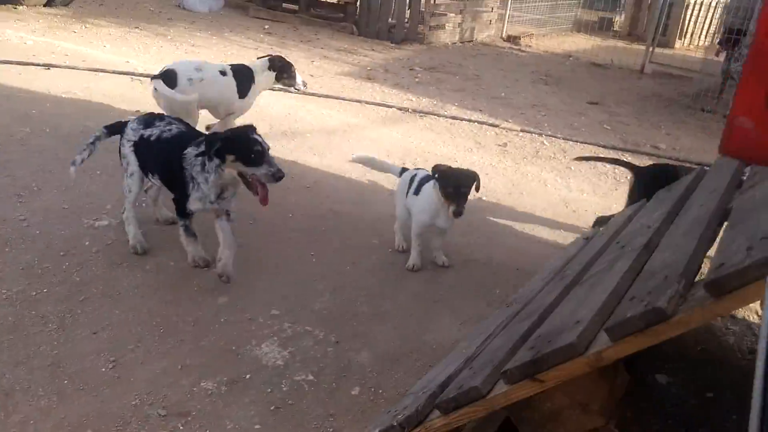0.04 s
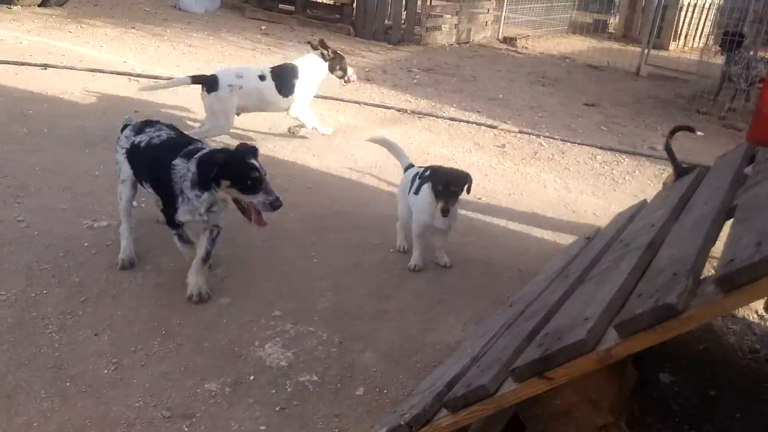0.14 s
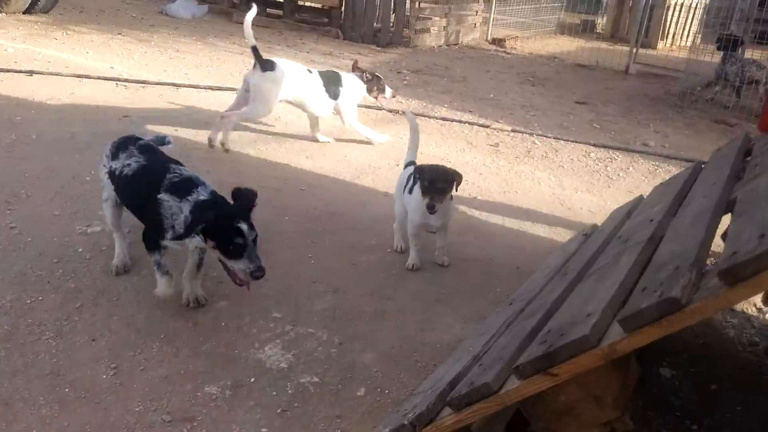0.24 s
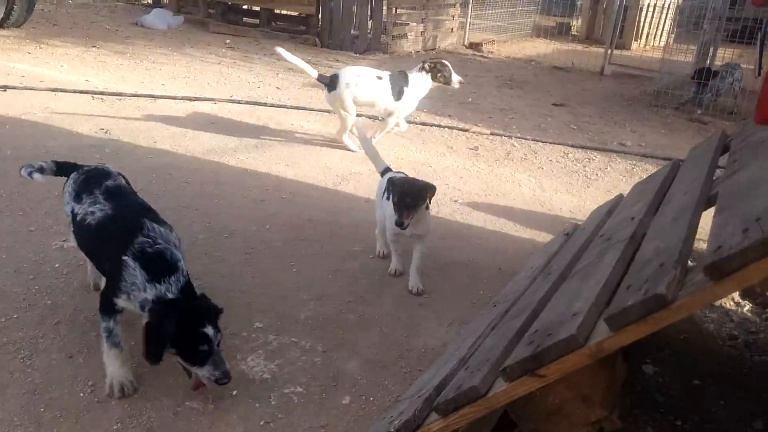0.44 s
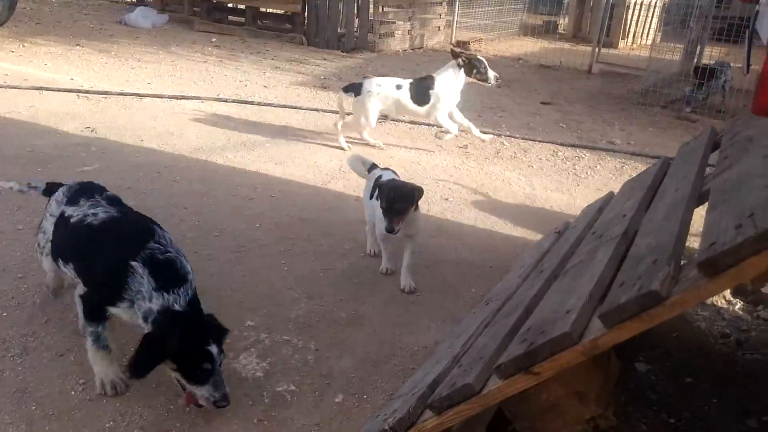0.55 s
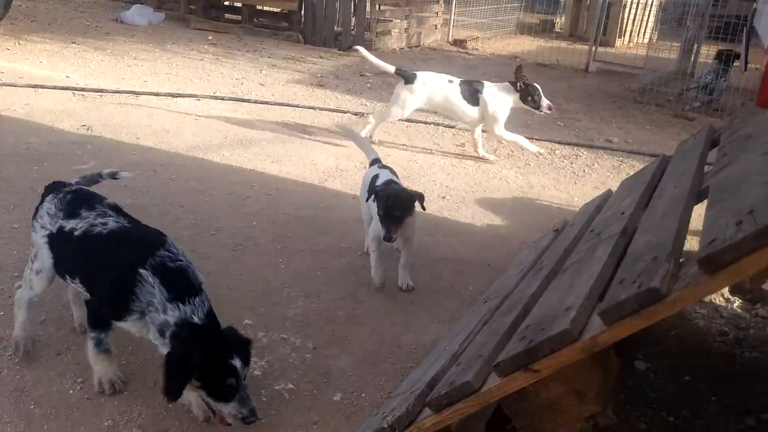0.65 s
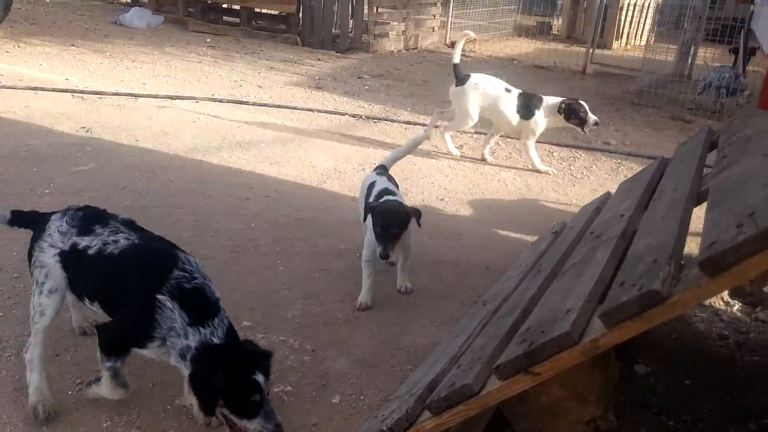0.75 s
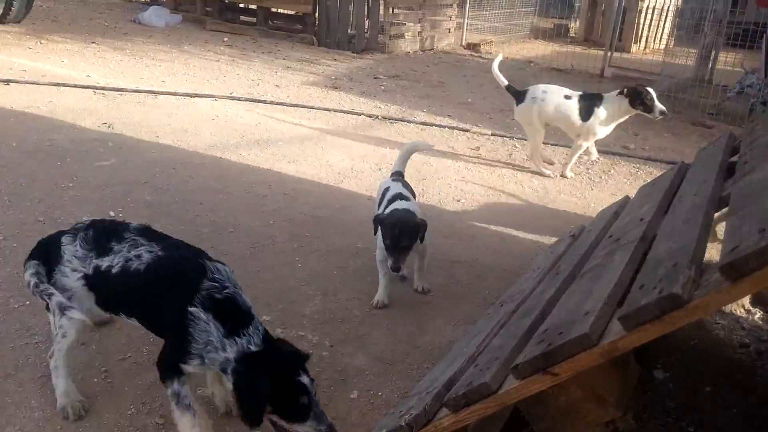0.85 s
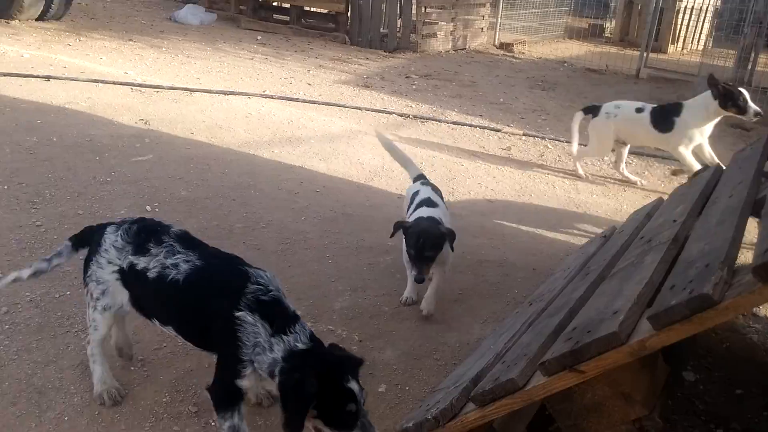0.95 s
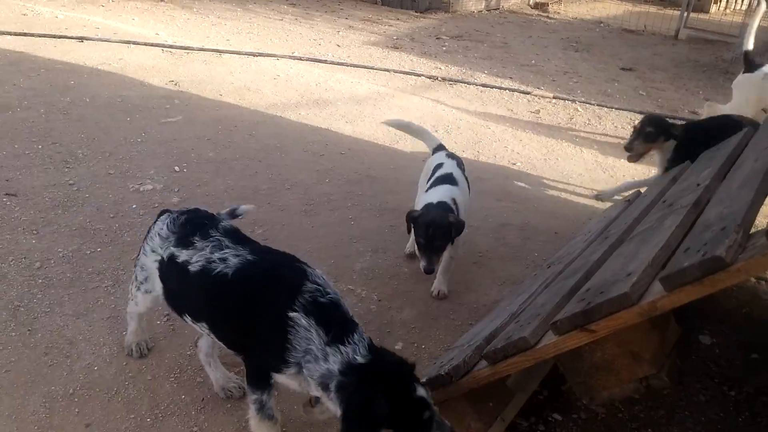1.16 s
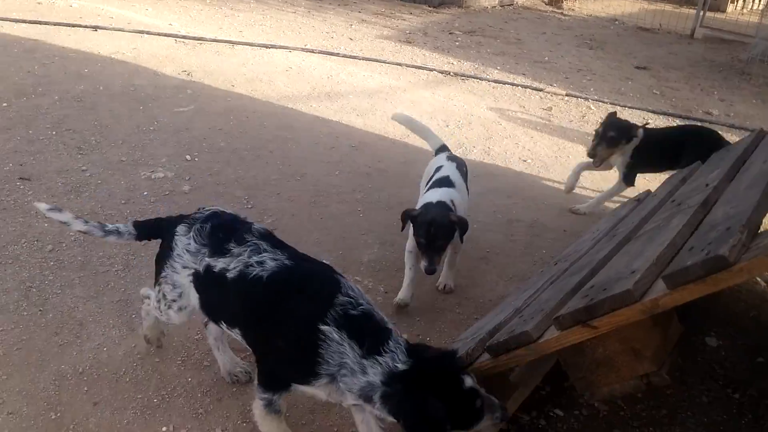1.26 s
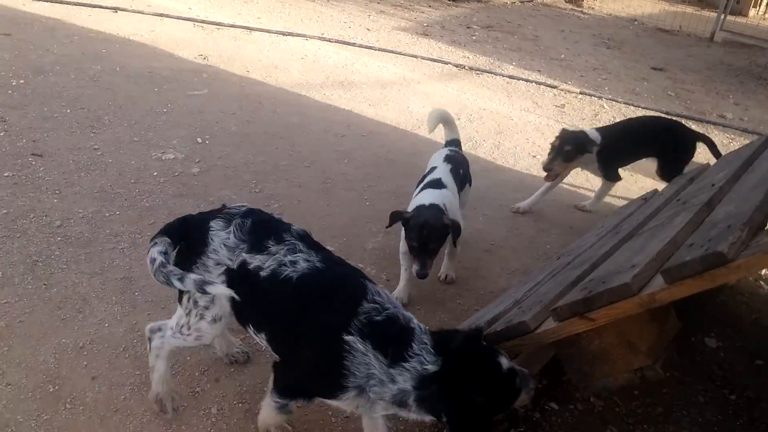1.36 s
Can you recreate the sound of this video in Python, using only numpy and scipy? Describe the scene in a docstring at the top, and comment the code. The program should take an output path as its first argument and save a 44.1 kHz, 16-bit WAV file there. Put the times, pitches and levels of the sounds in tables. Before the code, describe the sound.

A dog gives three short, hoarse barks in a yard, with faint whines between.

```python
"""An open yard with fences and sheds, a dog a little to the right of the microphone.
After the hissy tail of an earlier bark come three short, hoarse barks, each an arch of pitch from the
vocal folds with rasp on top; the first cracks into a yelp. Thin whines and two scuffs of paws on grit
fall in between. The fences and sheds throw everything back over quiet outdoor air."""
import sys
import numpy as np
from scipy import signal
from scipy.fft import rfft, irfft
from scipy.io import wavfile
from scipy.ndimage import uniform_filter1d

SR = 44100
rng = np.random.default_rng(int(sys.argv[2]) if len(sys.argv) > 2 else 0)


def master_out(mix):
    """Clip the mix to full scale and print it as 16-bit PCM to the path in sys.argv[1]."""
    frames = np.transpose(np.atleast_2d(mix))
    ceiling = np.clip(frames, -1, 1)
    pcm = np.round(ceiling * 32767).astype(np.int16)
    wavfile.write(sys.argv[1], SR, pcm)


N = 61739
BIN_HZ = np.arange(N // 2 + 1) * SR / N


def undb(db):
    """Decibels to gain."""
    return 10 ** (np.asarray(db) / 20)


def unit(x):
    """Scale to rms 1."""
    return x / np.sqrt(np.mean(x ** 2))


def gain_at(hz, points):
    """Read a table of f/Hz, level/dB as gains."""
    f, db = np.array(points, float).T
    return undb(np.interp(np.log(hz + 1), np.log(f), db))


def colour(x, points):
    """Filter by a table of f/Hz, level/dB, falling steeply beyond its ends; scale to rms 1."""
    f = BIN_HZ + 1
    edges = 1 / np.sqrt((1 + (.7 * points[0][0] / f) ** 8) * (1 + (.7 * f / points[-1][0]) ** 8))
    return unit(irfft(rfft(x) * gain_at(f, points) * edges, N))


def noise(points):
    """Coloured noise of rms 1."""
    return colour(rng.standard_normal(N), points)


def wobble(hz):
    """Smooth random motion of rms 1, mostly slower than hz."""
    return unit(signal.sosfilt(signal.butter(4, hz, fs=SR, output="sos"), rng.standard_normal(N)))


def swell(t, centre, width):
    """A bell curve of height 1."""
    return np.exp(-.5 * ((t - centre) / width) ** 2)


def partials(weights, phases):
    """A weighted sum of sines at rms 1."""
    return (weights * np.sin(phases)).sum(axis=0) / np.sqrt((weights ** 2).sum(axis=0) / 2)


def controls(t, rows):
    """A gate over the rows' span, then each column as a curve in time."""
    times, *columns = np.array(rows, float).T
    gate = uniform_filter1d(1. * ((t > times[0]) & (t < times[-1])), size=200)
    return [gate] + [np.interp(t, times, column) for column in columns]


def diffuse(low_hz=55, high_hz=780):
    """White noise from all around the microphone: left and right are alike between the two limits."""
    alike = BIN_HZ ** 2 / (BIN_HZ ** 2 + low_hz ** 2) / (1 + (BIN_HZ / high_hz) ** 4)
    mid, side = rfft(rng.standard_normal((2, N)))
    mid, side = mid * np.sqrt(1 + alike), side * np.sqrt(1 - alike)
    return irfft(np.array([mid + side, mid - side]), N) / np.sqrt(2)


# Spectrum of the air over the yard: f/Hz, level/dB
AIR_SPECTRUM = [(35, -24.5), (70, -0.5), (600, -0.5), (1000, -11), (2800, -9), (6500, -23), (15000, -42)]
def still_air():
    """Quiet, steady outdoor air on every side."""
    return undb(-52.5) * colour(diffuse(), AIR_SPECTRUM)


# Spectrum of an echo hanging in the yard: f/Hz, level/dB
ECHO_SPECTRUM = [(400, -22.5), (600, 2.5), (1000, -7), (1500, -15), (2100, -6), (3500, -33)]
def dying_echo(t, start_db=-31, fall_db_per_s=113):
    """A diffuse echo that dies away in the opening moments."""
    return colour(diffuse(), ECHO_SPECTRUM) * undb(start_db - fall_db_per_s * t)


# Colour of what fences and sheds throw back: f/Hz, level/dB
REFLECTION_COLOUR = [(500, -2.5), (590, 2.5), (720, -2.5), (3000, 2)]
def yard(t, source, left_lag_s=.0002, fence_s=.0395, scatter_t60_s=.22, low_t60_s=.83, high_t60_s=.95):
    """Direct sound from the right, an echo off the near fence, a quick scatter and a longer tail."""
    def arrival(x, delay_s):
        return np.array([np.interp(t - delay_s - lag_s, t, x, left=0) for lag_s in (left_lag_s, 0)])

    def fade(t60_s):  # reflections build up over 12 ms, then die away
        return np.clip(t / .012, 0, 1) ** 2 * np.exp(-np.log(1000) * t / t60_s)

    thrown = irfft(rfft(source) * gain_at(BIN_HZ, REFLECTION_COLOUR), N)
    far = diffuse()
    low = signal.sosfiltfilt(signal.butter(2, 1100, fs=SR, output="sos"), far)
    tail = (low * fade(low_t60_s) + (far - low) * fade(high_t60_s)) / np.linalg.norm(fade(low_t60_s))
    scatter = diffuse() * fade(scatter_t60_s) / np.linalg.norm(fade(scatter_t60_s))
    response = undb(-12) * tail + undb(-6.5) * scatter
    reverb = signal.fftconvolve(thrown[None], response, axes=1)[:, :N]
    return arrival(source, 0) + undb(-14) * arrival(thrown, fence_s) + reverb


# Balance at the microphone, left minus right: f/Hz, level/dB
BALANCE = [(500, -1.5), (2400, -6), (4400, -15.5), (8000, -16.5), (14000, 8.5)]
def shade_left(stereo):
    """The microphone's left side is shaded, and quieter in all but the highest treble."""
    shade = np.sqrt(gain_at(BIN_HZ, BALANCE))
    return irfft(rfft(stereo) * np.array([shade, 1 / shade]), N)


# Hissy tail of an earlier bark, then two paw scuffs: centre t/s, level/dB, half length/s
HISSY_BURSTS = [(0.017, -52.5, 0.017), (0.644, -49.5, 0.0088), (0.911, -45, 0.025)]
# Spectrum of these bursts: f/Hz, level/dB
BURST_SPECTRUM = [(800, -12.5), (1600, 19.5), (3900, 1), (6200, 1.5), (12500, -44.5)]
# Dull bumps: onset t/s, level/dB
DULL_BUMPS = [(0.937, -31.5), (1.332, -28)]
# Spectrum of a bump: f/Hz, level/dB
BUMP_SPECTRUM = [(230, -13.5), (620, -5), (1100, -18), (3500, -22), (4500, -44)]
def bark_tail_and_paws(t, rise_s=.007, decay_s=.0088):
    """An earlier bark fades in a brief hiss at the start; later, paws scuff on grit and bump dully."""
    bursts = sum(undb(db) * swell(t, at, width) for at, db, width in HISSY_BURSTS)
    rough_hiss = unit(noise(BURST_SPECTRUM) * undb(2.4 * wobble(280)))
    bumps = np.zeros(N)
    for at, db in DULL_BUMPS:
        rise = np.clip((t - at) / rise_s, 0, 1) ** 2
        bumps += undb(db) * rise * np.exp(-np.abs(t - at - rise_s) / decay_s)
    return bursts * rough_hiss + bumps * noise(BUMP_SPECTRUM)


# Whines to the right of the microphone, one table each: t/s, f/Hz, level/dB
WHINE_PATHS = [
    [(.123, 4635, -53.5), (.18, 4363, -60), (.24, 4314, -52)],
    [(.77, 5490, -75), (.85, 5350, -69)],
    [(.84, 1538, -51), (.93, 1530, -46)],
    [(.878, 2823, -45.5), (.897, 2558, -44.5), (.913, 2511, -31), (.945, 2550, -59)],
    [(.928, 2120, -35), (.939, 1860, -27.5)],
    [(1.264, 2850, -47), (1.282, 2614, -36), (1.296, 2381, -41), (1.35, 2351, -41)],
]
def whine(t, rows, jitter_hz=32, shimmer=.35):
    """A thin whistle with a weak octave; the low ones quaver, the high ones are nearly pure."""
    gate, hz, db = controls(t, rows)
    quaver = np.interp(hz, [2600, 4300], [1, .15])
    phase = 2 * np.pi * np.cumsum(hz + quaver * jitter_hz * wobble(400)) / SR
    octave = undb(-23.5) * gain_at(2 * hz, [(5050, -1), (5300, -14)])
    tone = np.sqrt(2) * (np.sin(phase) + octave * np.sin(2 * phase))
    return gate * undb(db) * tone * (1 + quaver * shimmer * wobble(90))


# Mouth resonances in the second and third barks: centre t/s, half length/s, f/Hz, level/dB
MOUTH_RINGS = [(.512, .02, 835, -28.5), (.548, 0.0086, 1520, -27), (1.085, 0.011, 1900, -28),
               (1.07, 0.024, 4430, -53), (1.085, 0.0094, 5830, -50)]
def mouth_ring(t, at, width, hz, db, half_band_hz=40, rise_per_s=.25):
    """A narrow resonance of the mouth swells and fades, rising as the jaw opens."""
    phase = 2 * np.pi * np.cumsum(hz * (1 + rise_per_s * (t - at))) / SR
    band = wobble(half_band_hz) * np.cos(phase) + wobble(half_band_hz) * np.sin(phase)
    return undb(db) * swell(t, at, width) * band


# Weight that throat and mouth give to the harmonics: f/Hz, level/dB
THROAT_COLOUR = [(250, 4), (600, 13), (900, 0.5), (1600, -18.5), (2450, -16.5), (3000, -11.5),
                 (4000, -49.5), (6100, -48.5), (11000, -77)]
def vocal_folds(hz, jitter, shimmer, overtone_db, flutter_hz=178.5):
    """Unsteady folds heard through the throat; returns the tone, its phase and the pulsing airflow."""
    phase = 2 * np.pi * np.cumsum(hz * (1 + jitter * wobble(flutter_hz))) / SR
    harmonic = np.arange(1, 9)[:, None]
    weights = gain_at(harmonic * hz, THROAT_COLOUR) * np.where(harmonic > 1, undb(overtone_db), 1)
    tone = partials(weights, harmonic * phase) * (1 + shimmer * wobble(flutter_hz))
    return tone, phase, 1 + .75 * np.cos(phase)


# The crack at the end of the first bark: t/s, f/Hz, level/dB
YELP_PATH = [(0.272, 1248, -27.5), (0.286, 1230, -22.5), (0.3, 1219, -15), (0.316, 1214, -16.5),
             (0.322, 1043, -20), (0.334, 603, -23.5), (0.347, 407, -39.5), (0.361, 328, -43.5),
             (0.4, 326, -42)]
# Hiss of breath in yelp and barks: f/Hz, level/dB
HISS_SPECTRUM = [(3900, -9.5), (4450, 0), (5300, -12), (6000, 3.5), (6700, -5), (8400, -11), (12000, -51.5)]
def yelp(t, dulling_db_per_octave=13.5):
    """The voice breaks an octave up, then falls away and loses its overtones."""
    gate, hz, db = controls(t, YELP_PATH)
    overtone_db = dulling_db_per_octave * np.log2(hz / hz.max())
    tone, _, airflow = vocal_folds(hz, jitter=.009, shimmer=.13, overtone_db=overtone_db)
    return gate * undb(db) * (tone + undb(-36) * noise(HISS_SPECTRUM) * airflow)


# Barks a little right of the microphone, one table each: t/s, f/Hz, voice level/dB, rasp level/dB
BARK_PATHS = [
    [(.195, 190.5, -37.5, -74), (.212, 371.2, -38.5, -46.5), (.23, 577.2, -21.5, -29.5),
     (.255, 613.5, -13, -16.5), (.267, 605.7, -14, -21), (.274, 664.2, -25.5, -22),
     (.325, 594.6, -38, -34.5), (.35, 479, -65.5, -42)],
    [(.418, 214.4, -34, -59.5), (.452, 383.8, -36.5, -39), (.468, 421.4, -31.5, -26.5),
     (.49, 533.5, -18, -30), (.517, 568.6, -12, -26), (.546, 503.7, -25.5, -26.5), (.572, 434.7, -36, -32),
     (.6, 305.7, -43.5, -44), (.66, 261.5, -42.5, -56.5)],
    [(.968, 330, -51.5, -42), (.988, 484.1, -32.5, -53), (1.002, 585.5, -13.5, -41.5),
     (1.016, 646.5, -17, -29), (1.036, 559.5, -22, -23.5), (1.052, 573.5, -15.5, -21),
     (1.095, 689.2, -32, -24), (1.107, 695.7, -15, -27), (1.12, 556.7, -18, -28.5),
     (1.128, 443.6, -51, -34), (1.165, 196, -37, -48)],
]
# Colour of the rasp, one table per bark: f/Hz, level/dB
RASP_SPECTRA = [
    [(460, -43), (780, -10), (920, -3.5), (1480, -7.5), (2070, -11.5), (2940, -11.5), (4000, -57.5)],
    [(400, -20), (620, -8.5), (1180, -13.5), (1540, -13.5), (1910, -29.5), (3300, -28), (4000, -50.5)],
    [(460, -65.5), (780, -6), (1200, -14.5), (1700, -8.5), (2200, -20.5), (2900, -21), (4000, -51.5)],
]
# Rasp in the lowest resonance: f/Hz, level/dB
GROWL_SPECTRUM = [(280, -22), (570, -5.5), (700, 10), (1000, -27)]
def bark(t, rows, rasp_spectrum):
    """A voiced arch; under strain the folds beat unevenly, adding half-pitch lines, rasp and hiss."""
    gate, hz, voice_db, rasp_db = controls(t, rows)
    tone, phase, airflow = vocal_folds(hz, jitter=.0237, shimmer=.033, overtone_db=-6)

    def puffs(spectrum):  # turbulent air, pulsed by the folds
        return colour(rng.standard_normal(N) * airflow, spectrum)

    halves = np.arange(3, 14)[:, None] / 2
    half_pitch = partials(gain_at(halves * hz, rasp_spectrum), halves * phase + halves ** 2)
    rasp = undb(-3) * half_pitch + undb(-.5) * puffs(rasp_spectrum) + undb(-6) * puffs(GROWL_SPECTRUM)
    progress = (t - rows[0][0]) / (rows[-1][0] - rows[0][0])
    jaw_open = swell(progress, centre=.54, width=.051)
    hiss = undb(-36 + 9 * jaw_open) * puffs(HISS_SPECTRUM)
    return gate * (undb(voice_db) * tone + undb(rasp_db) * (rasp + hiss))


def scene():
    """The dog and the yard from the microphone's position, over still air."""
    t = np.arange(N) / SR
    barks = sum(bark(t, rows, rasp) for rows, rasp in zip(BARK_PATHS, RASP_SPECTRA)) + yelp(t)
    whines = sum(whine(t, rows) for rows in WHINE_PATHS)
    rings = sum(mouth_ring(t, *row) for row in MOUTH_RINGS)
    dog = yard(t, barks + rings + bark_tail_and_paws(t))
    dog += yard(t, whines) * undb([[-3.5], [0]])  # the whines sit further right
    return shade_left(dog + dying_echo(t)) + still_air()


def record(dry, fade_in_s=.004, top_hz=15650):
    """A short fade-in over the first few milliseconds; the recorder cuts the top."""
    fade_in = np.minimum(np.arange(N) / SR / fade_in_s, 1)
    return signal.sosfilt(signal.ellip(8, .2, 70, top_hz, fs=SR, output="sos"), dry * fade_in)


dry = scene()
out = record(dry)
master_out(out)
```